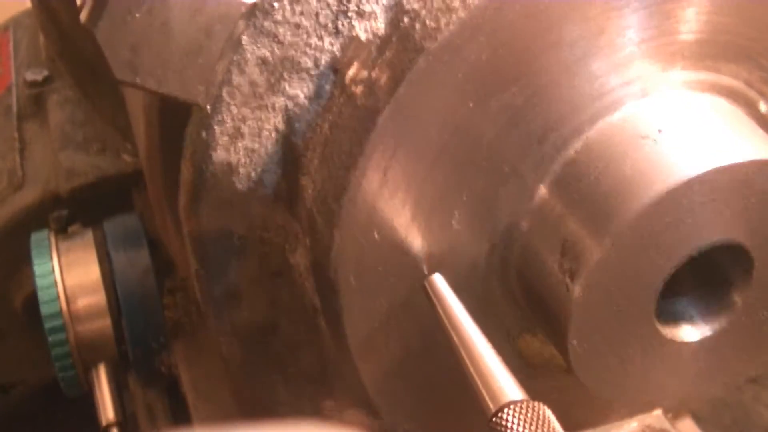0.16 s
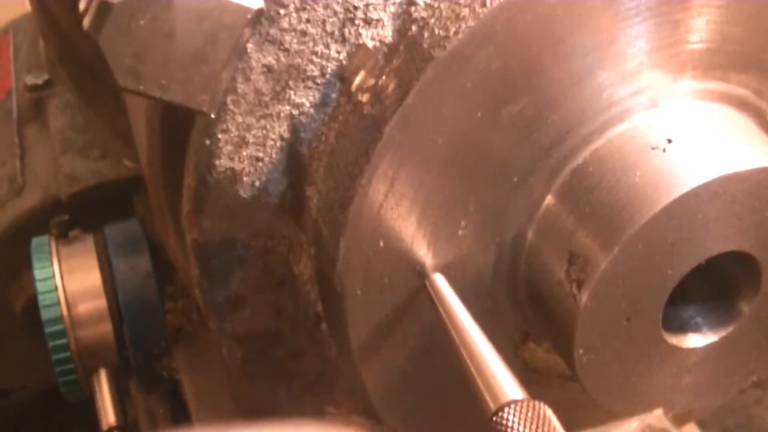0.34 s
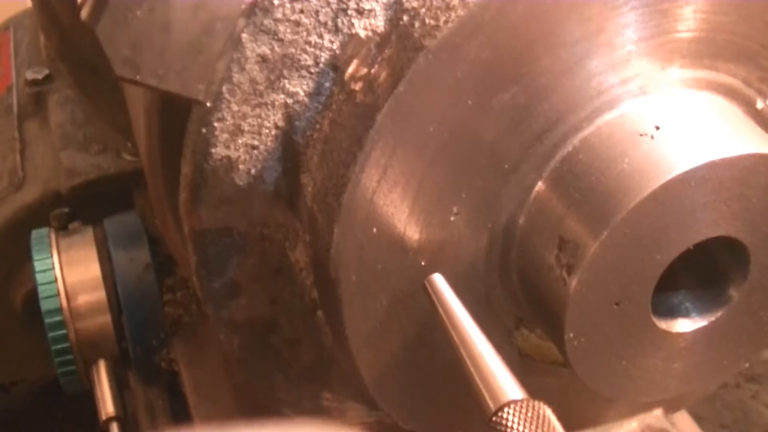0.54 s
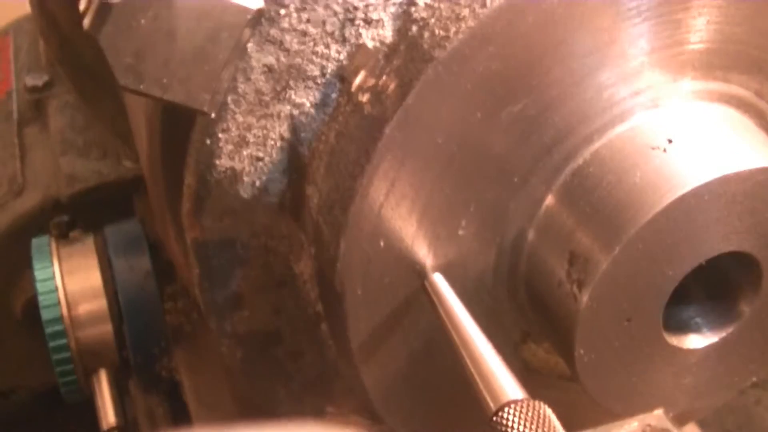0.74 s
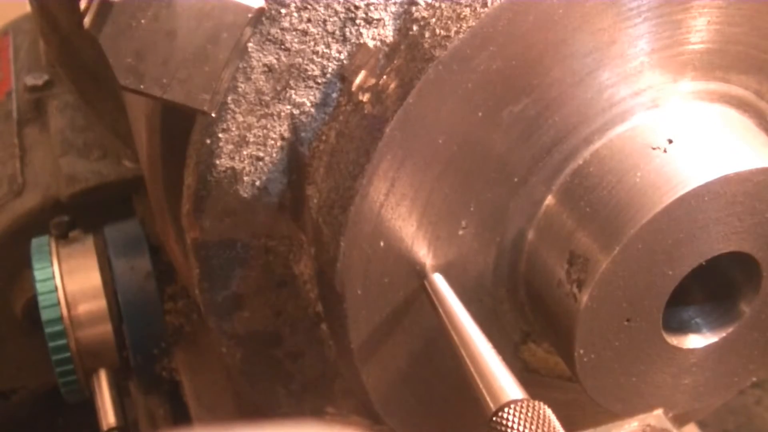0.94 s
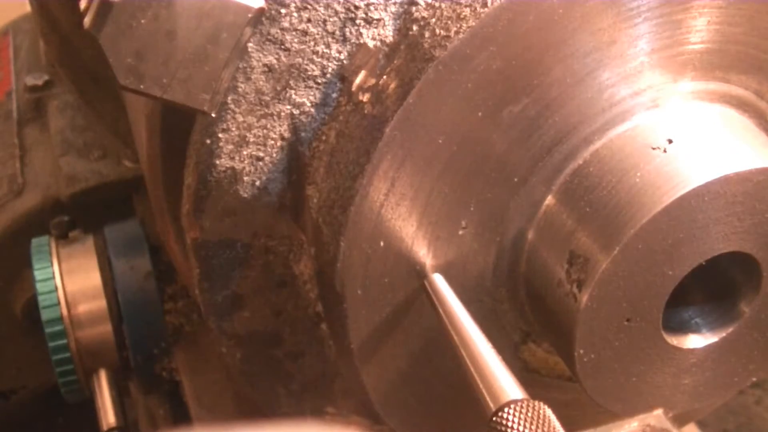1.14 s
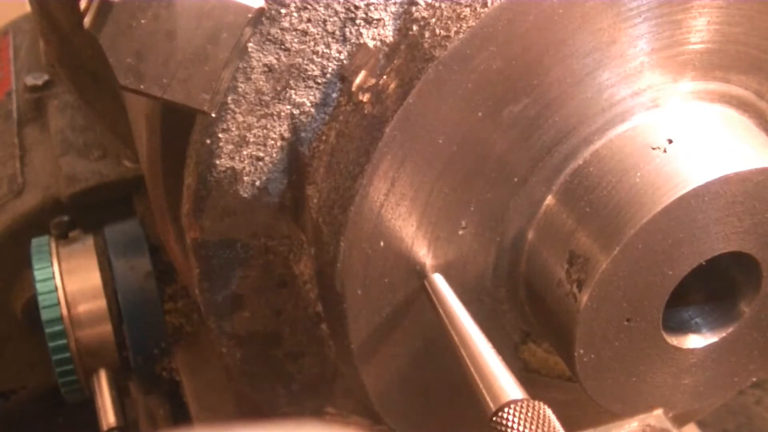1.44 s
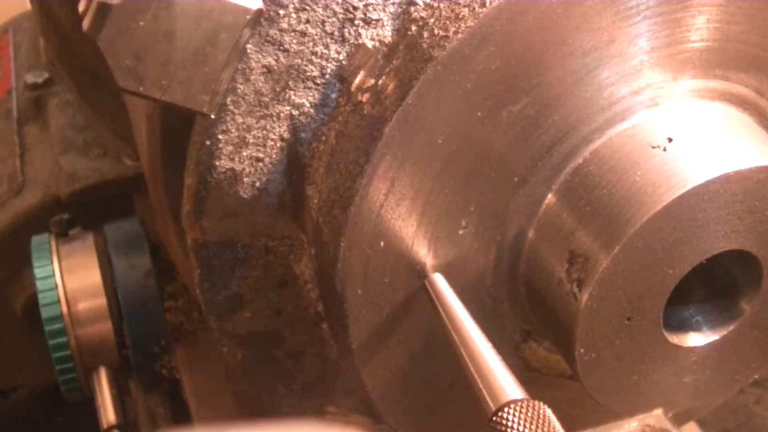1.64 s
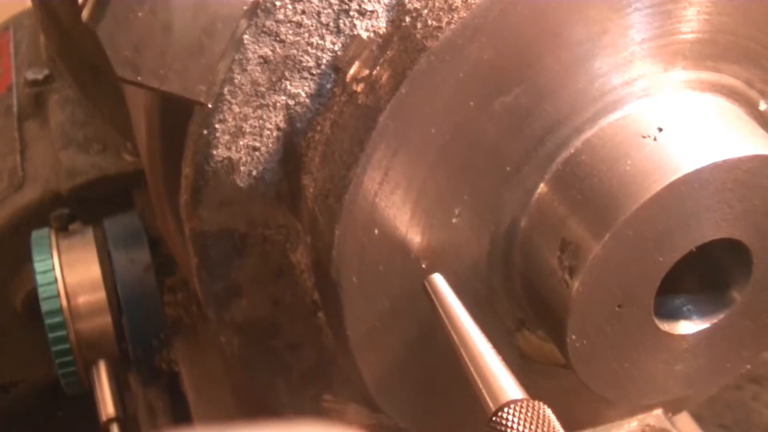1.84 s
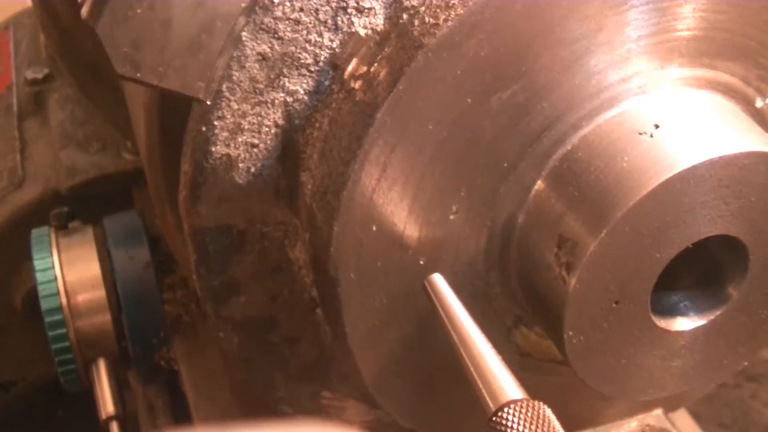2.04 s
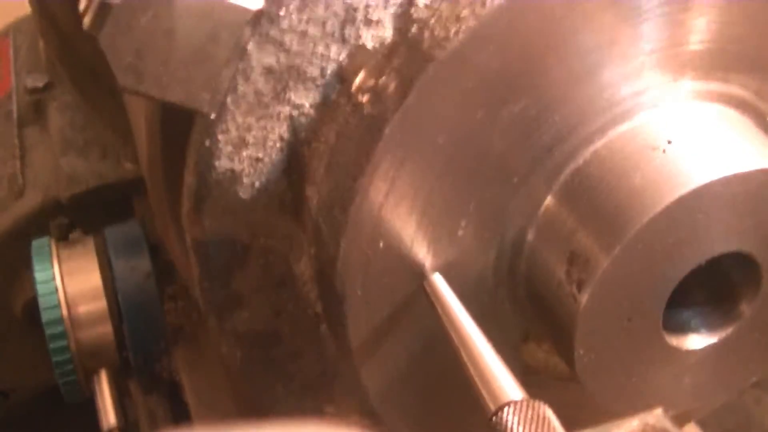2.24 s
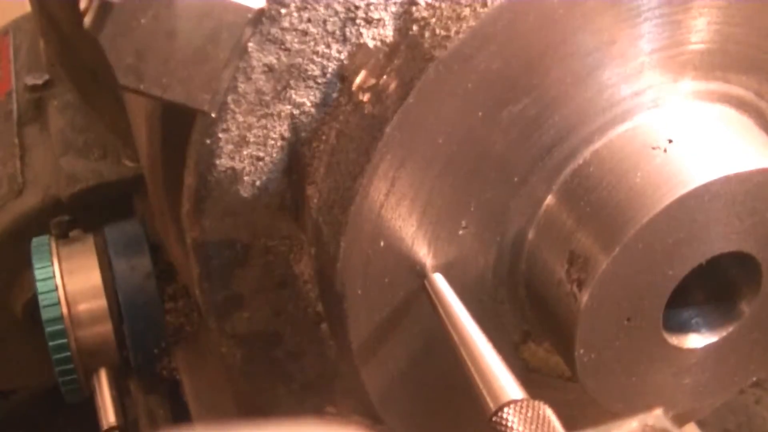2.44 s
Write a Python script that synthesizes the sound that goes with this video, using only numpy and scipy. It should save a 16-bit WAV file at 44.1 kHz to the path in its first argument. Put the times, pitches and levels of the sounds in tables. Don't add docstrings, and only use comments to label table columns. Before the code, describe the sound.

Spring-loaded steel punch snaps three times on a metal casting, with low thumps and loose rattling

```python
import sys
import numpy as np
from scipy import signal
from scipy.fft import rfft, irfft, next_fast_len
from scipy.io import wavfile
from scipy.ndimage import map_coordinates

SR = 44100
rng = np.random.default_rng(int(sys.argv[2]) if len(sys.argv) > 2 else 0)


def wav_record(signal):
    frames = np.transpose(np.atleast_2d(signal))
    bounded = np.clip(frames, -1, 1)
    quanta = np.round(bounded * 32767).astype(np.int16)
    wavfile.write(sys.argv[1], SR, quanta)


def boost_factor(decibels):
    exponent = np.asarray(decibels, float) / 20
    return 10 ** exponent


N = 114660


def unit(x):
    return x / np.sqrt(np.mean(x ** 2) + 1e-20)


def along(points, hz):
    point_hz, value = np.transpose(points)
    return np.interp(np.log(hz + 1), np.log(point_hz + 1), value)


def wobble(rate):
    knots = rng.standard_normal(int(N * rate / SR) + 4)
    return map_coordinates(knots, [np.arange(N) * rate / SR])


def rush(spectrum, alike, size=N):
    padded = next_fast_len(size)
    hz = np.fft.rfftfreq(padded, 1 / SR)
    turn = np.arccos(np.clip(along(alike, hz), -1, 1)) / 2
    colour = boost_factor(along(spectrum, hz)) * (hz > 15)
    gain = colour * [np.cos(turn), np.sin(turn)]
    white = rng.standard_normal((2, padded))
    mid, side = irfft(rfft(white) * gain, padded)[:, :size]
    return unit(np.array([mid + side, mid - side]))


def decay(t, t60):
    return boost_factor(-60 * t / t60)


def onset(t, rise_s):
    return 1 - np.exp(-t / rise_s)


def ring(hz, t60, rise_s, t, phase=0):
    return decay(t, t60) * onset(t, rise_s) * np.sin(2 * np.pi * hz * t + phase)


def dying(x, t60s):
    hz, t, bands = signal.stft(x, SR, nperseg=256)
    faded = bands * decay(t, along(t60s, hz)[:, None])
    return signal.istft(faded, SR, nperseg=256)[1][:, :x.shape[1]]


def add(out, s, x):
    at = round(s * SR)
    part = out[..., max(at, 0):][..., :x.shape[-1] + min(at, 0)]
    part += x[..., max(-at, 0):][..., :part.shape[-1]]


# frequency in Hz, level in dB.
HUSH_SPECTRUM = [(25, -28), (113, -6.5), (250, -11.5), (600, -15), (1600, -18.5), (5000, -26), (11000, -29),
                 (15800, -36.5)]
# frequency in Hz, left-right likeness from 0 to 1.
DIFFUSE_LIKENESS = [(60, 0.95), (240, 0.2), (950, 0.3), (3770, 0.44), (15000, 0.11)]


def hush():
    return boost_factor(-55.5 + 0.13 * wobble(6.37)) * rush(HUSH_SPECTRUM, DIFFUSE_LIKENESS)


# time in seconds, level in dB.
HAND_EFFORT = [(0, -50.5), (.1, -62), (.3, -65), (.43, -47), (.6, -57.5), (1.0, -63), (1.25, -61.5),
               (1.5, -74), (1.62, -58), (1.72, -53.5), (1.85, -50.5), (1.95, -57), (2.0, -70), (2.45, -56),
               (2.54, -57.5), (2.6, -49.5)]
# frequency in Hz, level in dB.
SKIN_SPECTRUM = [(40, -34), (150, -10), (275, -2.5), (600, -8.5), (2250, -10.5), (5000, -15), (9000, -20.5),
                 (15800, -41)]
# frequency in Hz, level in dB.
RUMBLE_SPECTRUM = [(20, -8.5), (45, -8.5), (90, -9), (200, -16), (400, -65)]


def hand():
    s, db = np.transpose(HAND_EFFORT)
    effort_db = np.interp(np.arange(N) / SR, s, db)
    rub = boost_factor(3.5 + 1.7 * wobble(150) + 0.41 * wobble(10)) * rush(SKIN_SPECTRUM, DIFFUSE_LIKENESS)
    rumble = boost_factor(-13.5 + 8.3 * wobble(15)) * rush(RUMBLE_SPECTRUM, [(30, .8), (100, 1.0)])
    return boost_factor(effort_db) * (rub + rumble)


# start in seconds, then levels in dB of the push and of modes 1, 2 and 3.
THUMPS = [
    (-.2, -8, -14.5, -40.5, -17),
    (0.2292, 3.5, -8.5, -19, -21),
    (0.4198, -18.5, -34, -39.5, -37),
    (.46, -58, -34, -66, -59),
    (0.7257, -1.5, -12, -28.5, -21),
    (2.183, -31, -54, -41.5, -31.5),
    (2.2397, 3.5, -9.5, -17, -20.5),
    (1.73, -32, -70, -60, -47.5),
    (2.529, -54, -34, -55, -46.5),
]
# frequency in Hz, T60 in seconds, half the pair's gap in Hz, beat phase in radians.
STAND_MODES = [
    (120.3, 0.37, 4.06, -0.73),
    (184.8, 0.45, 4.45, 1.2),
    (255.3, 0.34, 5.4, 1.4),
]


def stand():
    push, sway = np.zeros(N), np.zeros(N)
    t = np.arange(SR // 2) / SR
    swing_hz, swing_rate = 9.5, 3.6
    rock = swing_hz / swing_rate * np.sin(2 * np.pi * swing_rate * t)
    for s, push_db, *levels in THUMPS:
        add(push, s, boost_factor(push_db) * ring(147.3, 0.033, 0.0024, t))
        for i, (db, (hz, t60, gap, start)) in enumerate(zip(levels, STAND_MODES)):
            beat = np.sin(2 * np.pi * gap * t + start)
            phase = rock if i == 0 else 0
            add(sway, s, boost_factor(db) * beat * ring(hz, t60, 0.00089, t, phase))
    high_pass = signal.butter(2, 70, "high", fs=SR, output="sos")
    body = signal.sosfilt(high_pass, push + sway * boost_factor(3 * wobble(40)))
    return body * boost_factor([[1.2], [-1.2]])


# start in seconds, clatter level in dB, shudder level in dB.
BLOWS = [
    (0, -49.5, -43),
    (.227, -19, -25),
    (.724, -20.5, -21),
    (2.237, -17.5, -24.5),
    (0.419, -37.5, -31),
    (2.535, -43, -29),
]
# frequency in Hz, level in dB.
CLATTER_SPECTRUM = [(150, -13.5), (300, -8.5), (600, -10.5), (1370, -12), (3320, -21.5), (7110, -26.5),
                    (13000, -33.5), (15800, -54)]
# frequency in Hz, T60 in seconds.
CLATTER_DAMPING = [(250, 0.41), (700, 0.26), (2000, 0.21), (5000, 0.18), (12000, 0.12)]
# frequency in Hz, left-right likeness from 0 to 1.
NEAR_LIKENESS = [(100, 1), (300, 0.95), (2000, 0.93), (6000, 0.52), (12000, 0.038)]


def clatter():
    out, low = np.zeros((2, N)), np.zeros((2, N))
    t = np.arange(SR // 2) / SR
    for s, db, shudder_db in BLOWS:
        grains = dying(rush(CLATTER_SPECTRUM, NEAR_LIKENESS, size=len(t)), CLATTER_DAMPING)
        add(out, s, boost_factor(db) * onset(t, 0.0013) * grains)
        shudder = rush(RUMBLE_SPECTRUM, [(30, 0.94), (100, 1.0)], size=len(t))
        add(low, s, boost_factor(shudder_db) * decay(t, 0.39) * onset(t, 0.15) * shudder)
    return out * boost_factor(2.2 * wobble(400)) + low


# start in seconds, peak level in dB.
BOUNCES = [(0.0371, -29.5), (0.066, -36.5), (0.2579, -10.5), (0.296, -17), (0.337, -20.5), (0.367, -20),
           (0.3906, -28.5), (0.4147, -30), (0.4424, -18.5), (0.4736, -15.5), (0.5031, -22), (0.5268, -24),
           (0.552, -25), (0.5803, -29.5), (0.7058, -16), (0.7549, -9.5), (0.796, -20.5), (0.834, -18),
           (0.8644, -20.5), (0.8904, -29.5), (0.915, -38), (0.942, -35), (0.9696, -34), (2.2687, -15),
           (2.3026, -29), (2.319, -19), (2.351, -16), (2.3774, -22.5), (2.4019, -22), (2.4273, -25),
           (2.454, -30.5),
]
# frequency in Hz, level in dB, T60 in seconds.
PART_MODES = [(1517, -8.5, 0.023), (1843, -2, 0.015), (2047, -9.5, 0.022), (2207, -9.5, 0.052),
              (2570, -4.5, 0.017), (2918, 4.5, 0.0066), (3300, -13, 0.019), (3600, 0.5, 0.0062)]
PART_BAND = [1414, 3770]


def rattle():
    out = np.zeros(N)
    t = np.arange(SR // 10) / SR
    for s, db in BOUNCES:
        lean_db = 2.5 * rng.standard_normal(len(PART_MODES))
        bounce = boost_factor(2.5) * (t == 0)
        for (hz, mode_db, t60), lean in zip(PART_MODES, lean_db):
            bounce = bounce + boost_factor(mode_db + lean) * ring(hz * (1 + 0.0033 * lean), t60 * boost_factor(0.52 * lean), 0.00013, t)
        add(out, s + 0.0016, boost_factor(db - 7) * bounce)
    out = signal.sosfilt(signal.butter(4, PART_BAND, "band", fs=SR, output="sos"), out)
    return out * boost_factor([[-2.5], [2.5]])


# start in seconds, length in seconds, level in dB, rise in seconds.
SCRAPES = [
    (0.158, 0.074, -35, 0.0057),
    (0.646, 0.11, -36, 0.0056),
    (2.176, 0.06, -33, 0.013),
]
# frequency in Hz, level in dB.
SPRING_SPECTRUM = [(88, -12), (150, -13.5), (303, -2), (430, -19), (901, -6.5), (1300, -16), (2740, -17),
                   (8470, -30.5), (15800, -48)]


def spring():
    t = np.arange(N) / SR
    shape = np.zeros(N)
    for s, length, db, rise in SCRAPES:
        sag = boost_factor(db - 28 * (t - s))
        shape += sag * np.clip((t - s) / rise, 0, 1) * (t < s + length)
    return shape * boost_factor(3.5 * wobble(350)) * rush(SPRING_SPECTRUM, NEAR_LIKENESS)


# start in seconds, peak level in dB, pitch in Hz, T60 in seconds.
SLIPS = [(0.162, -29.5, 2680, 0.04), (.164, -30.5, 4300, 0.017), (0.165, -40, 7300, 0.015),
         (.167, -27.5, 888, 0.036), (0.168, -41, 2710, 0.033), (.174, -22.5, 685, .025),
         (.168, -30.5, 275, 0.069), (.186, -25, 950, .035), (.205, -38, 300, .03), (0.2154, -31, 507, .02),
         (0.2199, -31, 1050, 0.02), (0.653, -26.5, 2780, .02), (.653, -31, 3900, 0.013),
         (.655, -34, 880, 0.0098), (.660, -42, 2750, .015), (.6665, -29, 580, .025),
         (.665, -32, 278, 0.055), (.671, -22, 940, 0.027), (.6745, -40, 1040, .02),
         (.680, -25, 710, 0.0095), (.693, -35, 1120, .02), (.695, -42, 3300, .015),
         (2.182, -30, 2300, 0.011), (2.185, -39, 4450, .015), (2.1845, -29.5, 617, 0.02),
         (2.1915, -24.5, 770, 0.013), (2.1992, -21.5, 304, 0.011), (2.203, -30, 700, 0.018),
         (2.212, -32, 910, 0.021), (2.217, -38, 890, .02), (2.232, -23, 2680, 0.0078)]
# start in seconds, peak level in dB, pitch in Hz, T60 in seconds.
CONTACTS = [(0.226, -29, 5300, .012), (0.2278, -24, 2520, 0.012), (0.2304, -22, 3000, .01),
            (0.2308, -16, 373, 0.048), (0.2297, -13, 251, 0.067), (0.2329, -15, 4560, 0.021),
            (.2337, -20.5, 9930, 0.0059), (0.2338, -15.5, 2517, 0.019), (.238, -12.5, 2370, 0.012),
            (0.2396, -14, 1476, 0.032), (0.2415, -16, 5140, 0.0066), (.248, -22, 5100, 0.0063),
            (.2435, -22, 986, 0.04), (.2615, -21, 2330, 0.009), (.276, -29, 5000, 0.0068),
            (.4175, -40, 6000, 0.0057), (0.432, -34, 1700, 0.023), (0.4249, -25.5, 235, .05),
            (0.43, -33.5, 3300, .015), (.434, -40, 4800, .015), (0.7234, -23.5, 1200, 0.011),
            (0.726, -14, 2294, 0.019), (0.7265, -19, 390, 0.044), (.7262, -17, 244, 0.073),
            (.745, -22, 196, 0.14), (0.7305, -4.5, 1040, 0.0074), (0.7298, -21.5, 10150, 0.016),
            (.7305, -19, 5900, 0.0088), (.732, -7.5, 2250, 0.0078), (0.7337, -10.5, 4360, 0.0069),
            (0.7356, -10, 1277, 0.02), (.7372, -6.5, 4550, 0.0055), (0.736, -13.5, 2390, 0.015),
            (0.7382, -17.5, 6050, 0.0057), (0.7427, -20, 4750, 0.0098), (.77, -45, 5370, 0.007),
            (2.2365, -23, 5730, .011), (2.2365, -25, 9600, 0.0085), (2.2383, -9, 2340, 0.026),
            (2.2379, -13.5, 1030, 0.033), (2.241, -20, 620, 0.046), (2.2395, -18.5, 2680, 0.018),
            (2.2399, -21, 294, 0.056), (2.2438, -20.5, 4680, .015), (2.244, -21, 2560, 0.0087),
            (2.2478, -10.5, 1780, .012), (2.2505, -21, 1220, 0.016), (2.253, -18.5, 4320, .008),
            (2.252, -21, 2660, 0.019), (2.274, -40, 4540, 0.013), (2.293, -35, 4800, .008)]
# start in seconds, peak level in dB, pitch in Hz, T60 in seconds.
TICKS = [(.615, -41.5, 820, 0.033), (1.1832, -42.5, 3070, 0.013), (1.34, -49, 400, 0.031),
         (1.428, -44, 5100, 0.013), (1.429, -37, 3440, 0.017), (1.6274, -36, 6640, 0.002),
         (.805, -38, 4970, 0.0076), (1.652, -36.5, 7700, 0.0038), (1.6735, -41.5, 1110, 0.034),
         (1.675, -42.5, 500, .03), (1.726, -41, 1510, 0.013), (1.756, -46, 4730, 0.017),
         (1.8984, -42, 2370, 0.0073), (1.948, -46, 6600, 0.017), (2.568, -39, 2520, 0.016),
         (2.542, -42.5, 900, .015), (2.575, -39.5, 347, .02)]


def contacts():
    out = np.zeros((2, N))
    t = np.arange(SR // 10) / SR
    ports = np.array([[1], [-1]])
    for s, db, hz, t60 in CONTACTS + SLIPS + TICKS:
        rise_s = 0.024 * t60
        near = np.zeros((2, len(t)))
        for detune, phase, skew in rng.standard_normal((4, 3)):
            mode_hz = hz * np.exp(0.14 * np.clip(detune, -1.5, 1.5))
            near += ring(mode_hz, t60, rise_s, t, phase + 0.52 * skew * ports)
        noise = rush([(200, -12), (hz, 0), (15500, -46)], NEAR_LIKENESS, size=len(t))
        crack = onset(t, 0.00023) * decay(t, 0.0023) * noise
        add(out, s, boost_factor(db) * (ring(hz, t60, rise_s, t) + 0.54 * near + 0.79 * crack))
    return out


# frequency in Hz, T60 in seconds.
SHOP_DAMPING = [(200, 0.44), (2000, 0.32), (10000, 0.24)]


def shop(x):
    tail = dying(rng.standard_normal((2, SR // 2)), SHOP_DAMPING)
    answer = signal.fftconvolve(x, tail / np.linalg.norm(tail[0]), axes=1)[:, :N]
    return boost_factor(-24.5) * answer


def scene():
    near = stand() + clatter() + rattle() + spring() + contacts()
    return hush() + hand() + near + shop(near)


def top_cut(x):
    return signal.sosfilt(signal.butter(12, 15920, fs=SR, output="sos"), x)


def record(dry):
    x = dry / (1 + np.abs(dry / 1.05) ** 6) ** (1 / 6)
    x = irfft(rfft(x) * (np.fft.rfftfreq(N, 1 / SR) < 15850), N)
    return top_cut(x)


dry = scene()
out = record(dry)
wav_record(out)
```